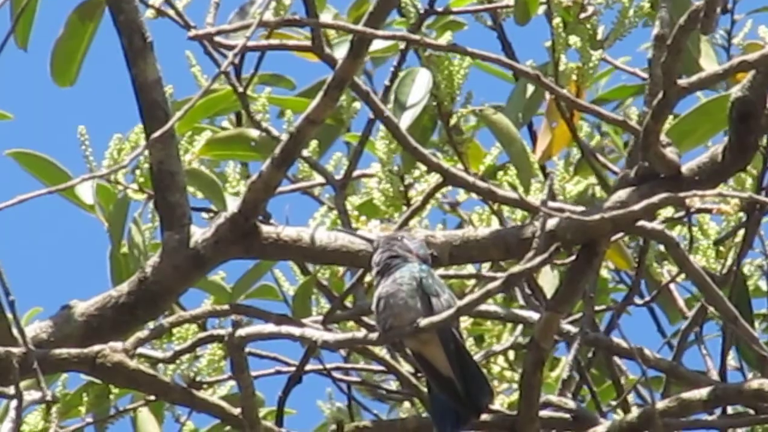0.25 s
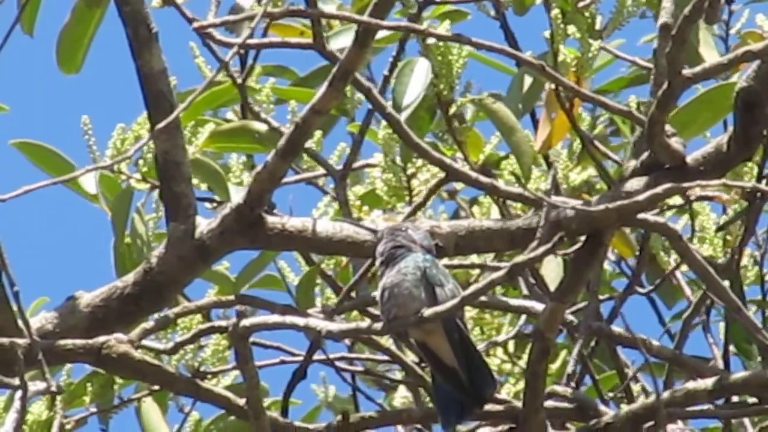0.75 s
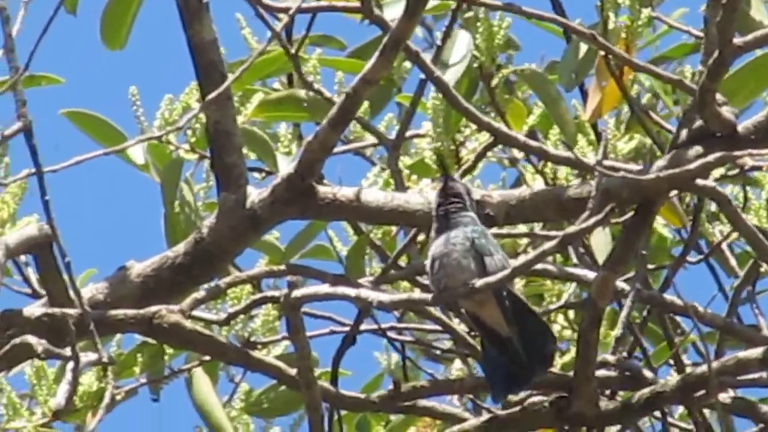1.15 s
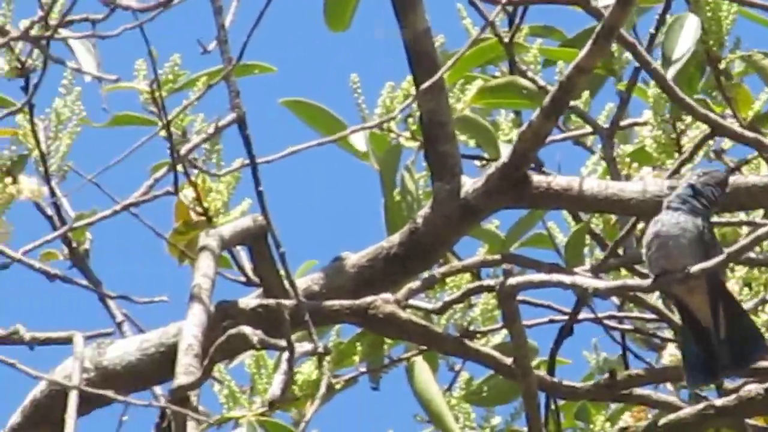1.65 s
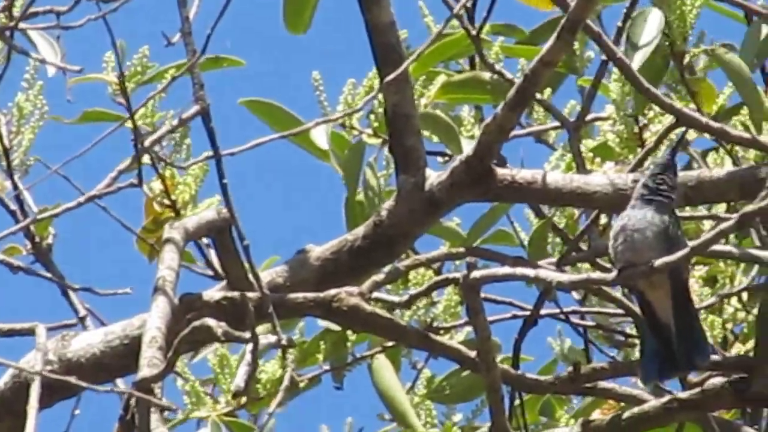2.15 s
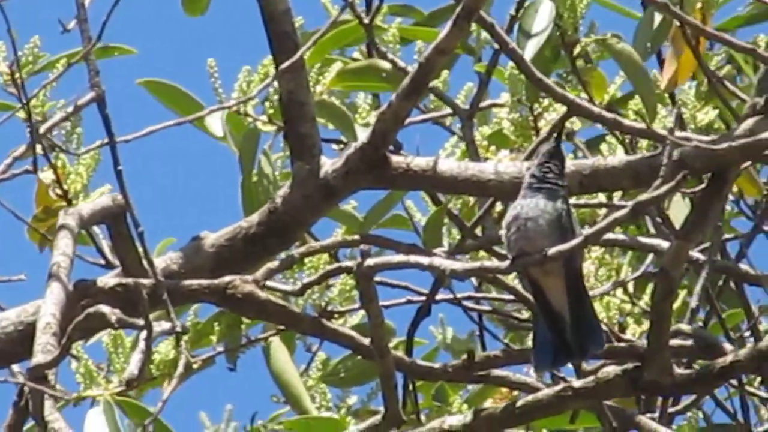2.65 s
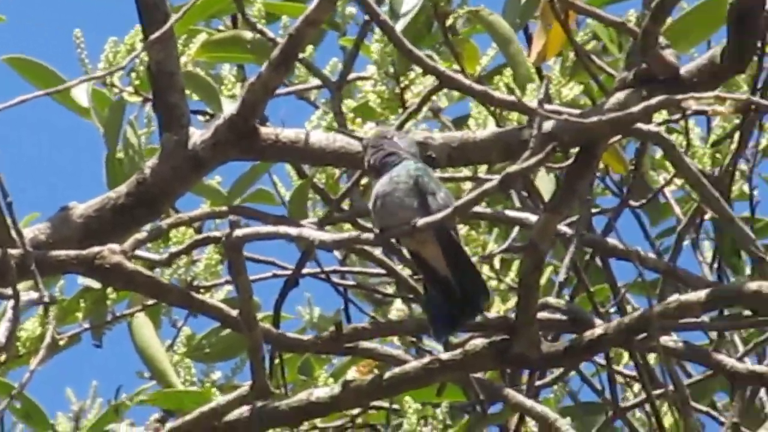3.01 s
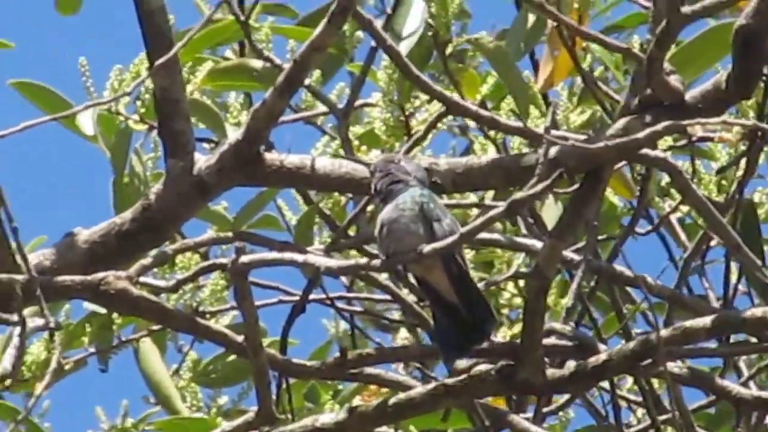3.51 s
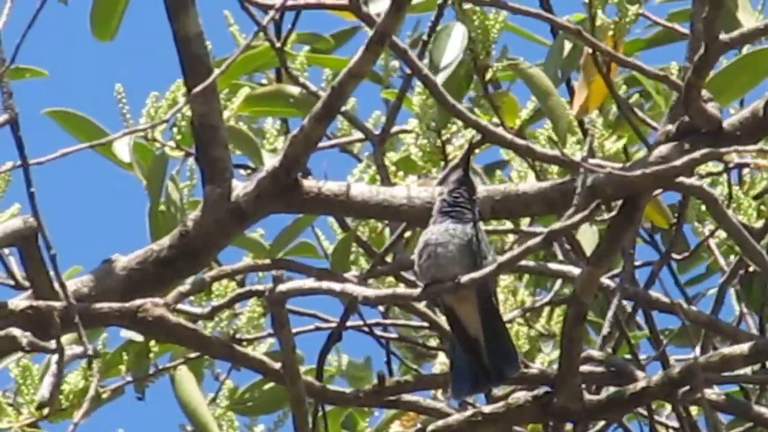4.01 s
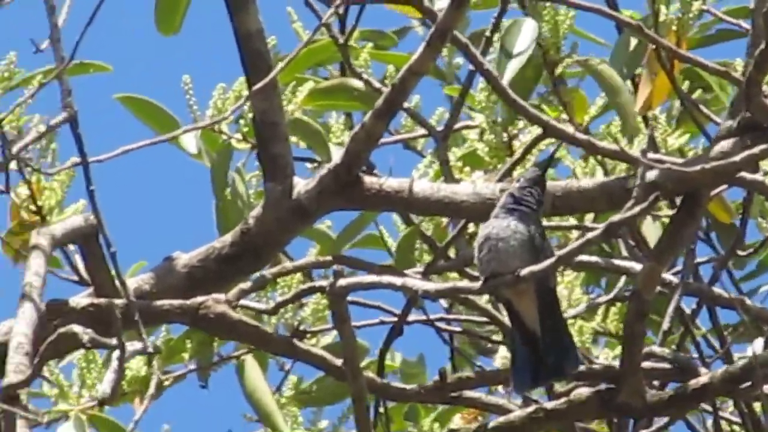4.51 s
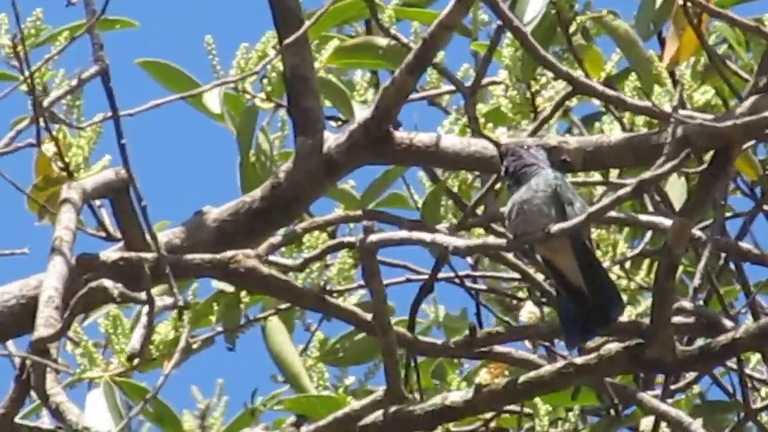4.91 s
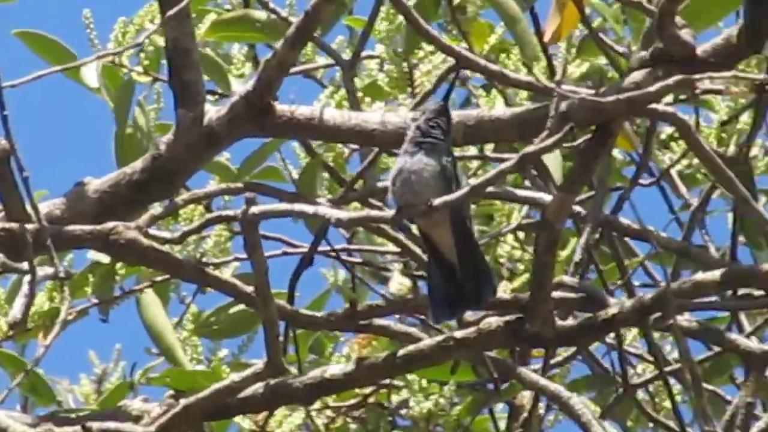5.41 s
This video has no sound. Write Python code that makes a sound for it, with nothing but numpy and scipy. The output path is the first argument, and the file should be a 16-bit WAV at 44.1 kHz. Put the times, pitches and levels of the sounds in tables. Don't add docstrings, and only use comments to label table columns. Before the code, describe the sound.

A hummingbird close by sings ten tiny, piercing high chips, evenly spaced, over faint town wash, with small handling knocks and a distant songbird.

```python
import sys
import numpy as np
from scipy import signal
from scipy.fft import rfft, irfft
from scipy.io import wavfile
from scipy.ndimage import uniform_filter1d

SR = 44100
rng = np.random.default_rng(int(sys.argv[2]) if len(sys.argv) > 2 else 0)


def pcm_store(signal):
    levels = np.round(np.clip(np.atleast_2d(signal), -1, 1) * 32767)
    wavfile.write(sys.argv[1], SR, levels.astype(np.int16).T)


def to_linear_factor(level_db):
    exponent = np.asarray(level_db, float) / 20
    return 10 ** exponent


N = 249592

# (resting pitch [Hz], slides of (middle [ms], slowness [ms], change [Hz]))
FALL_PITCH = [
    (10050, [(5.8, 2.3, -2800), (17, 3, -350)]),
    (6370, [(21.5, 3.6, -2730)]),
]
RISE_PITCH = [
    (300, [(4.5, 11, 6900)]),
    (7000, [(9, 1.8, 500)]),
]
WAVE_PITCH = [
    (10600, [(0, 2.3, -2500), (12, 1.5, 1300), (19.3, 1.5, -700)]),
    (10700, [(0, 3.5, -3650), (21, 2.2, 1000)]),
]
# (time [s], break [ms], pitch ratio [1], pace ratio [1], level [dB])
FALL_NOTES = [
    (1.2029, 19.2, .992, 1, -15.5),
    (2.0827, 15.7, 1.002, .98, -15),
    (2.9519, 16.9, 1.004, 1, -15),
    (3.8028, 15.7, 1, 1, -15),
    (4.6902, 13.4, 1.008, .96, -16),
]
RISE_NOTES = [
    (1.6425, 29.2, 1.005, 1.01, -16.5),
    (3.3750, 25.8, .995, 1.04, -16.5),
    (5.1187, 25, 1.017, .93, -16.5),
]
WAVE_NOTES = [
    (2.5125, 19.9, 1, .99, -18),
    (4.2310, 19.4, .983, .99, -21),
]
# (starts below by [dB], swell [ms], 1 dB down at [ms], collapse [ms])
FALL_EFFORT = [
    (1, 48.3, 5.5, 0.0102),
    (-3, 1.1, 8.5, 7.03),
]
RISE_EFFORT = [
    (2.34, 38.6, 9.2, .01),
    (-1, 6.8, 0.3, 5.4),
]
WAVE_EFFORT = [
    (-5.5, 28, 2.3, .36),
    (6, 3.1, 9.3, 3.9),
]
# (flutter rate [Hz], flutter depth [Hz], flutter depth
# [dB], flutter change [dB/ms], air hiss [dB])
FALL_MANNER = (395.5, 6, -0.1, 0.5762, -23)
RISE_MANNER = (390, 520, -2, -.25, -35)
WAVE_MANNER = (280, 25, .8, .8, -38)
# (overtone frequency [Hz], 2nd harmonic [dB], 3rd harmonic [dB])
OVERTONES = [(6000, -5, -31), (9300, -18.5, -27), (12580, -26.5, -29.5), (13900, -33.5, -34),
             (16000, -25.5, -36.5)]
# (pitch [Hz], gain [dB])
BEAK = [(3000, 4.2), (4500, 0.5), (6000, 1.6), (7200, 3), (8500, -1), (10000, 4.5)]
# (start [ms], energy [dB], t60 [s])
LEAVES = [
    (1.2, -9, 0.041),
    (7.9, -13.5, 0.21),
    (40, -28.5, 0.43),
]
# (frequency [Hz], gain [dB])
LEAF_COLOUR = [(3000, 2.5), (5000, -1), (7000, -4.5), (9000, -3), (14000, -2)]
# (time [s], level [dB], ring [Hz], t60 [s], click [dB])
KNOCKS = [
    (3.503, -43, 765, 0.063, -17),
    (3.52, -41, 780, 0.051, -24),
    (3.585, -51, 824, .1, -24),
    (3.615, -47, 396, 0.14, -24),
    (3.6695, -44, 618, 0.15, -9),
    (3.670, -41, 900, 0.064, -23),
    (3.673, -40.5, 175, 0.062, -31),
    (4.4063, -41, 1034, 0.07, -11),
    (4.4075, -47, 2200, 0.027, -6),
]
# (time [s], start pitch [Hz], level [dB])
FAR_CHIPS = [
    (2.25, 3450, -66),
    (2.295, 4200, -60),
    (2.368, 3400, -65),
    (2.414, 4270, -57),
    (2.544, 4080, -59),
    (2.672, 4020, -62),
    (2.81, 3930, -63),
    (3.10, 3830, -63),
]
# (time [s], length [s], start pitch [Hz], level [dB])
FAR_WHISTLES = [
    (1.927, 0.15, 3630, -65),
    (5.259, 0.041, 3500, -62),
    (5.455, .08, 3520, -69),
    (5.485, .03, 7600, -67.5),
]
# (frequency [Hz], density [dB per Hz])
TOWN = [(27, -22), (49, -3.5), (141, -2.5), (230, -6), (800, -0.7), (1100, -2.5), (5730, -17), (16000, -30)]
# (frequency [Hz], left-right likeness [1])
TOWN_ALIKE = [(60, 0.95), (130, 0.39), (290, 0.07), (640, 0.58), (1410, 0.55), (3100, -0.08), (6820, 0.15),
              (15000, -0.035)]
# (frequency [Hz], left minus right [dB])
TOWN_PAN = [(60, 2), (110, 3.5), (200, -2), (2380, -2), (4400, -0.7), (15000, -0.3)]
# (frequency [Hz], level [dB])
HUM = [(54, -74), (137, -75)]


def hummingbird():
    out = np.zeros((2, N))
    lead_s = 8e-6
    falling_closing_ms = 12.6
    # (last: left minus right, dB)
    kinds = ((FALL_PITCH, FALL_EFFORT, FALL_NOTES, FALL_MANNER, falling_closing_ms, 2.5),
             (RISE_PITCH, RISE_EFFORT, RISE_NOTES, RISE_MANNER, None, 1.5),
             (WAVE_PITCH, WAVE_EFFORT, WAVE_NOTES, WAVE_MANNER, None, 1.5))
    for pitch, strength, notes, manner, early_closing_ms, pan_db in kinds:
        for s, break_ms, ratio, pace, db in notes:
            closing_ms = early_closing_ms or break_ms
            note = to_linear_factor(db) * syrinx(pitch, strength, break_ms, closing_ms, ratio, pace, *manner)
            delay = np.exp(-2j * np.pi * np.fft.rfftfreq(len(note), 1 / SR) * lead_s)
            late = irfft(rfft(note) * delay, len(note))
            add(out, s, np.array([note * to_linear_factor(pan_db / 2), late * to_linear_factor(-pan_db / 2)]))
            add(out, s, signal.fftconvolve(note[None], leaves(), axes=1))
    return out


def syrinx(pitch, strength, break_ms, closing_ms, ratio, pace, flutter_hz, depth_hz, depth_db, change_db, air_db):
    ms = np.arange(int(0.07 * SR)) * 1000 / SR
    early, late = pace * ms, pace * (ms - closing_ms)
    hz = np.where(ms < break_ms, slide(early, *pitch[0]), slide(late, *pitch[1]))
    db = np.where(ms < break_ms, *effort(early, late, *strength))

    beat = 2 * np.pi * np.cumsum(flutter_hz * (1 + 0.25 * walk(570, len(ms)))) / SR
    since_break = ms - break_ms
    flutter_size = np.clip(since_break, 0, 1) * to_linear_factor(change_db * np.clip(since_break, 0, 15))
    flutter = flutter_size * np.sin(beat)
    hz = ratio * uniform_filter1d(hz, size=16) + depth_hz * flutter + 25 * walk(900, len(ms))

    phase = 2 * np.pi * np.cumsum(hz) / SR
    tone = np.sqrt(2) * np.sin(phase)
    for k in (2, 3):
        audible = k * hz < 0.45 * SR
        overtone_db = colour(OVERTONES, k * hz, column=k - 1) + 3
        tone += to_linear_factor(overtone_db) * audible * np.sin(k * phase)

    air_band = signal.butter(3, (5430, 7800), "band", fs=SR, output="sos")
    air = signal.sosfilt(air_band, rng.standard_normal(len(ms)))
    tone += to_linear_factor(air_db) * air / air.std()

    level_db = uniform_filter1d(db, size=40) + colour(BEAK, hz) + depth_db * flutter
    level_db = level_db + 0.408 * walk(600, len(ms))
    return tone * to_linear_factor(level_db) * np.clip(ms, 0, 1)


def slide(ms, rest_hz, slides):
    return rest_hz + sum(change_hz / (1 + np.exp((middle - ms) / slowness)) for middle, slowness, change_hz in slides)


def effort(ms, late, opening, closing):
    held_db, below_db, swell, sag_db = opening
    late_db, late_swell, down, collapse = closing
    start = held_db - below_db * np.exp(-ms / swell) - sag_db * ms
    end = -late_db * np.exp(-np.maximum(late, 0) / late_swell) - np.exp((late - down) / collapse)
    return start, np.maximum(end, -120)


def leaves():
    alike = 0.14
    t = np.arange(SR // 2) / SR
    echo = 0
    for start_ms, energy_db, t60 in LEAVES:
        age = t - start_ms / 1000
        shape = np.clip(age / 0.004, 0, 1) * to_linear_factor(-60 * np.maximum(age, 0) / t60)
        shape = shape / np.sqrt(np.sum(shape ** 2))
        echo = echo + to_linear_factor(energy_db) * shape * rng.standard_normal((3, len(t)))
    echo = np.sqrt(alike) * echo[0] + np.sqrt(1 - alike) * echo[1:]
    return irfft(rfft(echo) * to_linear_factor(colour(LEAF_COLOUR, np.fft.rfftfreq(len(t), 1 / SR))))


def knocks():
    out, t = np.zeros((2, N)), np.arange(SR // 8) / SR
    for s, db, hz, t60, click_db in KNOCKS:
        phase = 2 * np.pi * np.cumsum(hz * (1 + 0.054 * walk(300, len(t)))) / SR
        ring = np.sin(phase) * to_linear_factor(-60 * t / t60) * np.clip(t / 0.0019, 0, 1)
        click = uniform_filter1d(rng.standard_normal(len(t)), size=6) * to_linear_factor(click_db + 14 - 60 * t / 0.019)
        add(out, s, to_linear_factor(db) * (ring + click))
    return out


def far_bird():
    out = np.zeros((2, N))
    chip_s, chip_climb, whistle_climb = 0.03, 0.06, 0.0163
    calls = [(s, chip_s, hz, chip_climb, db) for s, hz, db in FAR_CHIPS]
    calls += [(s, length, hz, whistle_climb, db) for s, length, hz, db in FAR_WHISTLES]
    for s, length, start_hz, climb, db in calls:
        u = np.arange(int(length * SR)) / (length * SR)
        hz = start_hz * (1 + climb * np.sin(1.93 * u))
        call = np.sin(2 * np.pi * np.cumsum(hz) / SR) * np.sin(np.pi * u) ** 0.4
        add(out, s, to_linear_factor(db) * np.array([0.8 * call, 0.9 * np.roll(call, 2)]) * 2)
    return out


def town():
    level_db, lead_s = -51, 8e-5
    hz = np.fft.rfftfreq(N, 1 / SR)
    shared, left, right = rfft(rng.standard_normal((3, N)))
    alike = np.clip(colour(TOWN_ALIKE, hz), 0, 1)
    late = np.exp(-2j * np.pi * hz * lead_s)
    pair = np.sqrt(alike) * np.array([shared, shared * late]) + np.sqrt(1 - alike) * np.array([left, right])
    pan_db = colour(TOWN_PAN, hz)
    side_db = colour(TOWN, hz) + np.array([pan_db, -pan_db]) / 2
    wash = irfft(pair * to_linear_factor(side_db) / np.sqrt(1 + alike), N)
    return wash * to_linear_factor(level_db + 0.39 * walk(2.01, N)) / wash.mean(axis=0).std()


def hum():
    tones = 0
    for hz, db in HUM:
        phase = 2 * np.pi * np.cumsum(hz * (1 + 0.027 * walk(3.2, N))) / SR
        tones = tones + to_linear_factor(db + 0.88 * walk(5.6, N)) * np.sin(phase)
    return np.sqrt(2) * tones * to_linear_factor(np.array([[1.5], [-1.5]]))


def colour(table, hz, column=1):
    t = np.array(table, float)
    return np.interp(np.log(np.maximum(hz, 1)), np.log(t[:, 0]), t[:, column])


def walk(rate, count):
    k = int(SR / rate)
    w = uniform_filter1d(uniform_filter1d(rng.standard_normal(count), k), k)
    return w / w.std()


def add(out, s, sound):
    i = int(s * SR)
    out[:, i:i + sound.shape[-1]] += sound[..., :N - i]


def scene():
    return hummingbird() + knocks() + far_bird() + town() + hum()


def band_limit(x):
    return signal.sosfilt(signal.butter(12, 16810, fs=SR, output="sos"), x)


def record(dry):
    low_pass = signal.ellip(8, 0.1, 50, 15900, fs=SR, output="sos")
    mix = signal.sosfiltfilt(low_pass, dry)
    return band_limit(mix)


dry = scene()
out = record(dry)
pcm_store(out)
```